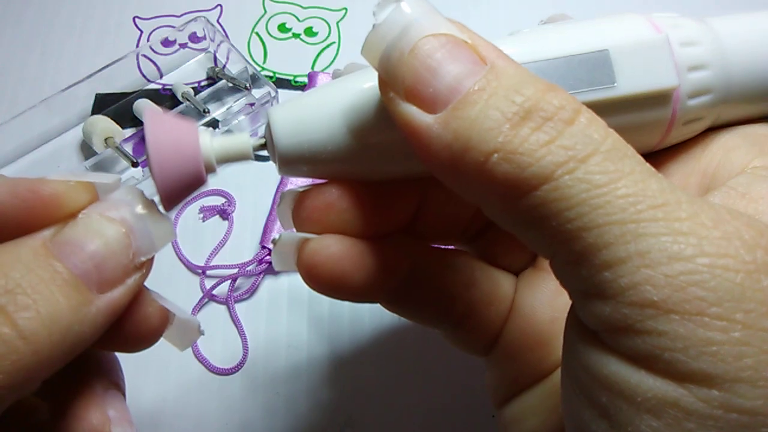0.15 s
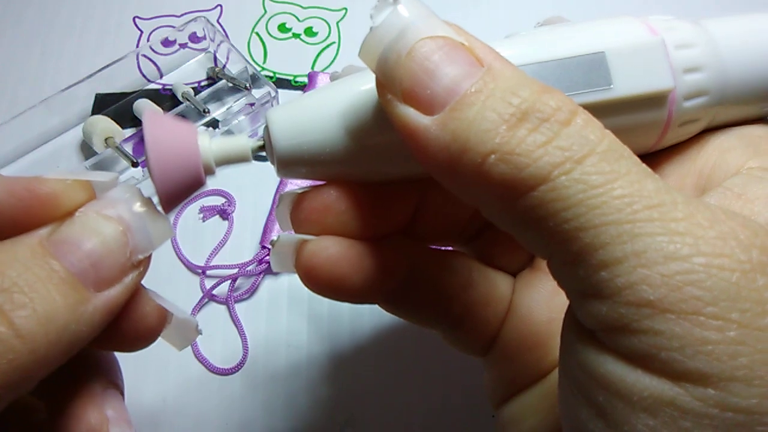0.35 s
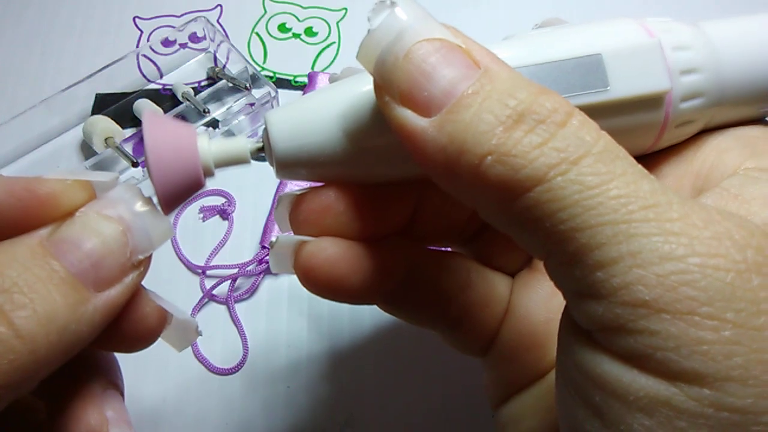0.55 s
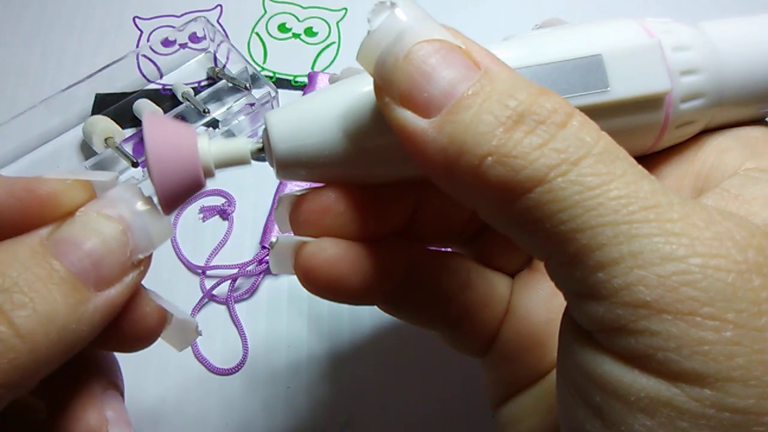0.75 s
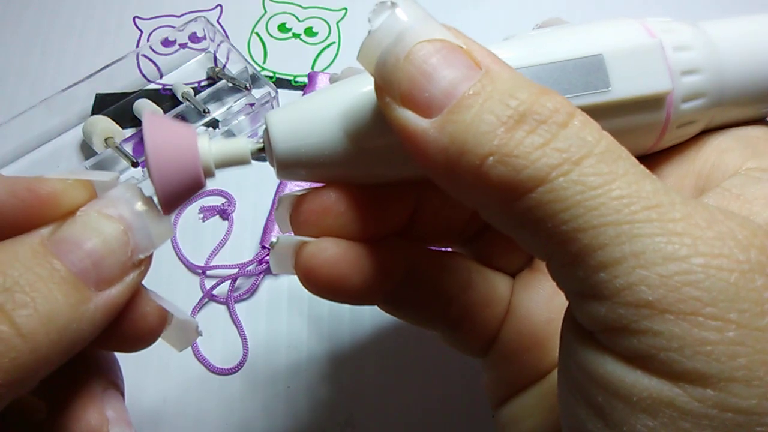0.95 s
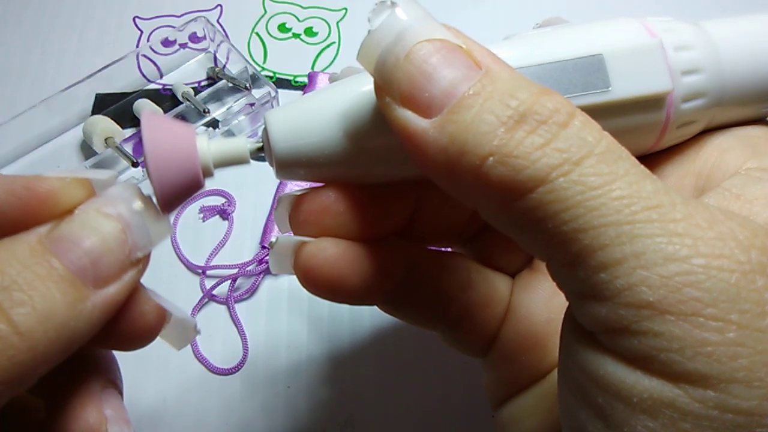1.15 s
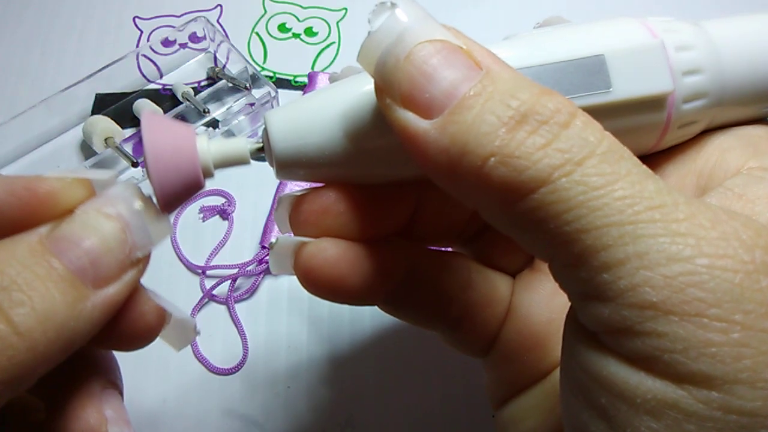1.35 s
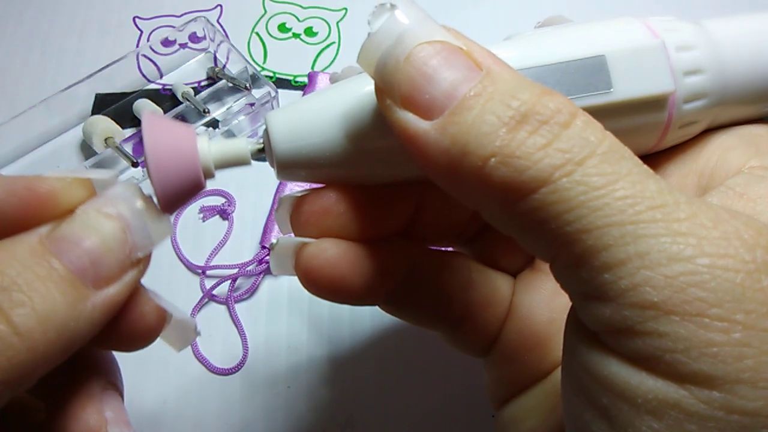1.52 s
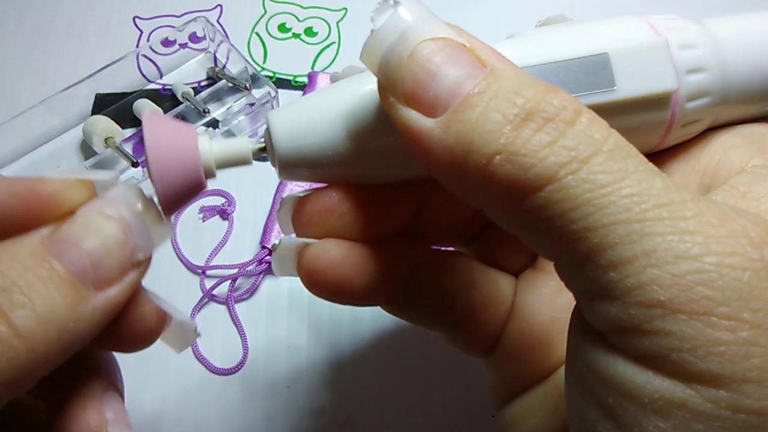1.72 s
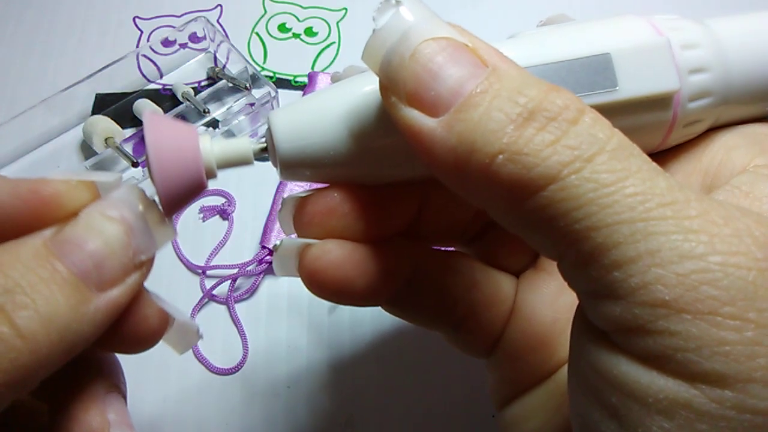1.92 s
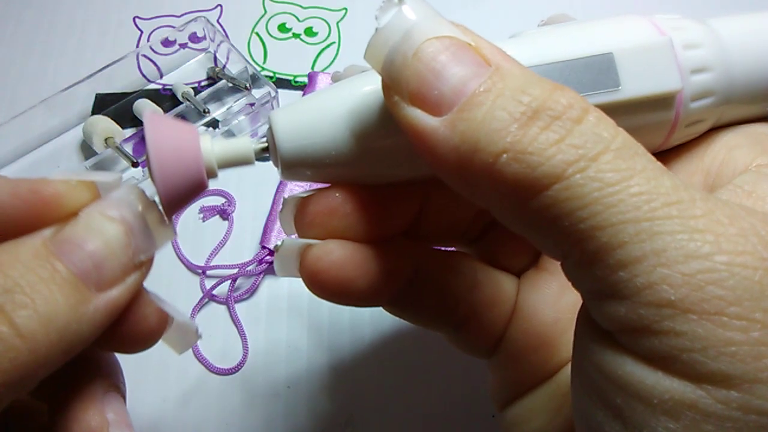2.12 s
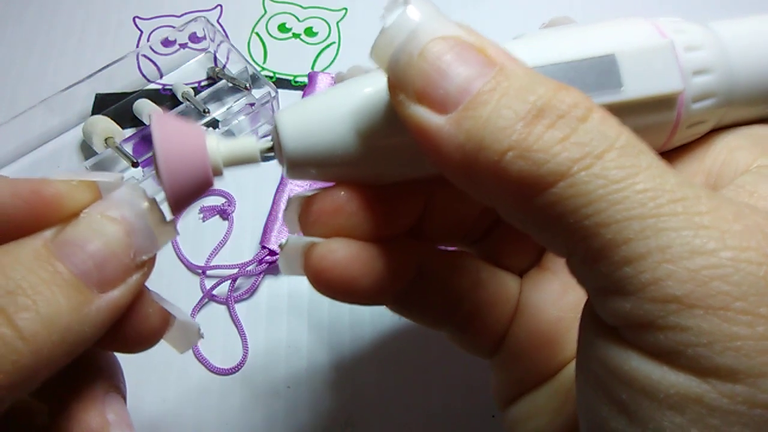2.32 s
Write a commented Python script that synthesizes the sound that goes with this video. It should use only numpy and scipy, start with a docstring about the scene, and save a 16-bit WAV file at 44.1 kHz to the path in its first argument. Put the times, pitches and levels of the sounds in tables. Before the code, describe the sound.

A small electric nail drill works on a plastic nail tip, very close, bright at right and duller at left. From 0 to 0.45 seconds it rattles and scrapes harshly; then mostly buzzy rattle, slowing until 1.1. Pressed hard, it sags to half speed: faint pulsing scrape, wavering low hum, soft hush, small ticks. Around 2.3 it leaps faster, and a hard hissy scrape bites at the end.

```python
"""A small electric nail drill held close to a pair of microphones, over a soft hush and rumble. At first its bit
rattles three times a turn in the chuck, while the stone scrapes a plastic nail tip once a turn and drums it.
Then, pressed hard, the motor sags to about half speed and the rattle mostly stops; at the end the stone jumps
free, the speed leaps up and a hard scrape bites. The motor's hum drops and swells meanwhile. The right
microphone faces the drill; the left hears it late, dull and mostly off the desk."""
import sys
import numpy as np
from scipy import signal
from scipy.fft import rfft, irfft, next_fast_len
from scipy.io import wavfile
from scipy.ndimage import uniform_filter1d, minimum_filter1d, map_coordinates

SR = 44100
rng = np.random.default_rng(int(sys.argv[2]) if len(sys.argv) > 2 else 0)


def volts(x):
    """Linear amplitude factor 10**(x/20) for a level x in dB, scalar or array-like."""
    e = np.asarray(x, float) / 20
    return 10 ** e


def wav_out(sig):
    """Save sig, one row per channel (or a flat mono array), as 16-bit PCM at SR to the path in sys.argv[1]."""
    wavfile.write(sys.argv[1], SR, np.round(np.clip(np.atleast_2d(sig).T, -1, 1) * 32767).astype(np.int16))


N = 104825  # length in samples


def unit(x):
    """Normalisation: x scaled to rms 1."""
    return x / np.sqrt(np.mean(x ** 2) + 1e-20)


def along(points, hz):
    """Logarithmic pitch: values of (pitch_hz, value) points, interpolated on a log axis."""
    point_hz, value = np.transpose(points)
    return np.interp(np.log(hz + 1), np.log(point_hz + 1), value)


def curves(rows):
    """Linear interpolation in time: one value per sample for each column after the time."""
    time_s, *columns = np.transpose(rows)
    return [np.interp(np.arange(N) / SR, time_s, column) for column in columns]


def wobble(rate):
    """Band-limited randomness: a smooth random curve with this many knots a second."""
    knots = rng.standard_normal(int(N * rate / SR) + 4)
    return map_coordinates(knots, [np.arange(N) * rate / SR])


def filtered(x, response):
    """Linear filtering: the spectrum of x times a complex response of frequency."""
    size = next_fast_len(N + SR // 2)
    return irfft(rfft(x, size) * response(np.fft.rfftfreq(size, 1 / SR)), size)[..., :N]


def coloured(x, spectrum):
    """Minimum-phase filtering: the folded cepstrum makes the spectrum causal; the result has rms 1."""
    size = 4096
    gain = volts(along(spectrum, np.fft.rfftfreq(size, 1 / SR)))
    cepstrum = irfft(np.log(np.maximum(gain, 1e-5)))
    cepstrum[1:size // 2] *= 2
    cepstrum[size // 2 + 1:] = 0
    impulse = irfft(np.exp(rfft(cepstrum)))
    return unit(signal.fftconvolve(x, impulse)[:N])


# Spectrum of the room hush: pitch_hz, density_db (relative, per Hz)
HUSH_SPECTRUM = [(30, -31), (170, -23), (600, -34), (3000, -36), (9900, -15.5), (14600, -53)]


def hush():
    """Diffuse background noise: room hush, uncorrelated at the two microphones."""
    level_db = -57
    return volts(level_db) * np.array([coloured(rng.standard_normal(N), HUSH_SPECTRUM) for _ in range(2)])


# Rumble through the hands: time_s, level_db (mean of the two sides)
RUMBLE_LEVEL = [(0, -54), (.4, -71.5), (.46, -76), (1.62, -80), (1.736, -59.5), (1.9, -76), (2.3, -83),
                (2.377, -59)]
# Spectrum of the rumble: pitch_hz, density_db (relative, per Hz)
RUMBLE_SPECTRUM = [(25, -3), (170, -10.5), (400, -18), (880, -60)]


def rumble():
    """Structure-borne noise: soft low rumble through the hands, uncorrelated at the two microphones."""
    level_db = curves(RUMBLE_LEVEL)[0] + [[-2.5], [2.5]]  # left, right
    return volts(level_db) * np.array([coloured(rng.standard_normal(N), RUMBLE_SPECTRUM) for _ in range(2)])


# Decay of desk and hands: pitch_hz, t60_s
DESK_DECAY = [(200, .06), (2000, .045), (10000, .03)]


def desk(x):
    """Early reverberation: short diffuse tails off desk and hands, randomly varied, crossfaded 14 times a second."""
    step = SR // 14
    out = np.zeros((2, N + SR))
    fade = np.hanning(2 * step)
    padded = np.pad(x, (step, 2 * step))
    for start in range(0, N + step, step):
        hz, t, z = signal.stft(rng.standard_normal((2, 4096)), SR, nperseg=128)
        decay = volts(-60 * t / along(DESK_DECAY, hz)[:, None])
        tail = signal.istft(z * decay, SR, nperseg=128)[1]
        tail /= np.linalg.norm(tail, axis=1, keepdims=True)
        piece = padded[start:start + 2 * step] * fade
        wet = signal.fftconvolve(piece[None], tail, axes=1)
        out[:, start:start + wet.shape[1]] += wet
    return out[:, step:step + N]


# Speed of the motor shaft: time_s, speed_turns_per_s
SPEED = [(0.0, 134.4), (0.08, 127.1), (0.2, 125.4), (0.3, 122.0), (0.355, 120.9), (0.39, 127.2),
         (0.44, 115.3), (0.475, 125.0), (0.51, 116.2), (0.56, 130.1), (0.62, 112.4), (0.65, 126.4),
         (0.69, 111.6), (0.77, 117.4), (0.82, 112.7), (0.88, 115.5), (0.95, 107.8), (1.06, 104.2),
         (1.11, 95.7), (1.2, 82.5), (1.28, 72.8), (1.36, 61.5), (1.45, 69.7), (1.55, 76.2), (1.62, 72.4),
         (1.72, 58.3), (1.82, 58.6), (1.9, 76.8), (1.97, 67.5), (2.06, 67.1), (2.13, 54.0), (2.22, 73.4),
         (2.28, 59.6), (2.3, 111.3), (2.38, 137.6)]


def turns():
    """Rotational kinematics: shaft angle in turns, the running integral of speed."""
    return np.cumsum(curves(SPEED)[0]) / SR


# Motor shake: time_s, level_db (before the trim in motor())
HUM_LEVEL = [(0, -60.5), (.33, -70), (.5, -70.5), (.93, -72.5), (1.02, -68.5), (1.13, -80), (1.2, -79),
             (1.39, -70), (1.47, -78), (1.64, -76.5), (1.73, -60), (1.85, -60), (1.92, -73), (1.97, -65),
             (2.04, -80), (2.25, -63), (2.3, -70), (2.35, -63)]
# Shaft orders: multiple of the shaft rate, level_db (relative)
ORDERS = [(1, 0), (2, -8)]


def motor():
    """Rotating imbalance: shaft orders shake the hand-piece; as it sags overtones fade and the hum moves left."""
    angle, (speed,), (level_db,) = turns(), curves(SPEED), curves(HUM_LEVEL)
    octaves = np.log2(speed / 110)
    lines = 0
    for order, db in ORDERS:
        growth_db = 8 * octaves * np.sqrt(order - 1)  # overtones gain with speed
        waver_db = (order - .6) * 3 * wobble(12)
        tone = np.sin(2 * np.pi * (order * angle + rng.random()))
        lines = lines + volts(db + growth_db + waver_db) * tone
    side_db = np.outer([-1, 1], 4 + 7.4 * octaves)  # left, right
    return volts(level_db + 2.5) * lines * volts(side_db)


# Contact strengths: time_s, rattle_db, scrape_db, drumming_db (before each source's own trim)
TOUCH = [(0.0, -27, -29, -43), (0.058, -22, -24.5, -37), (0.15, -25, -27, -51), (0.208, -26, -34.5, -50),
         (0.338, -20, -24, -38.5), (0.414, -26.5, -32, -47), (0.454, -24.5, -48, -47),
         (0.488, -30.5, -50.5, -47.5), (0.64, -31.5, -53, -44), (0.698, -28, -48.5, -44),
         (0.782, -26, -55, -45), (0.914, -29.5, -48, -42), (1.0, -31, -50, -46), (1.06, -28, -51, -45),
         (1.105, -33, -47, -47), (1.14, -44, -49, -58), (1.18, -65, -51, -76), (1.258, -72, -54.5, -76),
         (1.284, -62, -55, -56.5), (1.488, -75, -58, -68), (1.53, -43.5, -53.5, -50.5),
         (1.586, -60, -60.5, -67.5), (1.612, -46.5, -52.5, -52.5), (1.68, -47, -54.5, -65),
         (1.812, -67, -57, -73), (1.872, -61, -52, -53), (1.91, -63, -55, -86), (1.966, -59, -53.5, -50.5),
         (2.054, -47.5, -54.5, -55.5), (2.176, -79, -58.5, -73), (2.23, -68, -52.5, -70),
         (2.252, -68, -54.5, -57), (2.275, -68, -28.5, -81), (2.28, -75, -65, -84), (2.298, -67, -58, -75),
         (2.306, -56, -60.5, -57), (2.322, -40.5, -65, -48.5), (2.35, -39, -63, -49),
         (2.362, -42, -23, -53), (2.377, -47, -26, -65)]


def touch():
    """Contact force as level: the changing rattle, scrape and drumming levels in dB."""
    return curves(TOUCH)


def knocks(angle, contacts, decay_s, slip_turns):
    """Periodic impact: a blow, and a short dying burst of noise, at each contact angle of every turn."""
    scatter_db, drift_db, rise_s = .8, 1, .0007  # spread per blow, slow drift, soft start
    whole_turns = np.arange(-1, int(angle[-1]) + 1)
    blows = np.zeros(N)
    for at, db in contacts:
        slip, size = rng.standard_normal((len(whole_turns), 2)).T
        i = np.searchsorted(angle, whole_turns + at + slip_turns * slip)
        ok = (i > 0) & (i < N)
        hits = np.bincount(i[ok], volts(db + scatter_db * size[ok]), N)
        blows += hits * volts(drift_db * wobble(13.17))
    tail = signal.lfilter([1], [1, -np.exp(-1 / (decay_s * SR))], blows)
    tail = uniform_filter1d(tail, max(1, int(rise_s * SR)))
    return unit(blows), unit(tail * rng.standard_normal(N))


# Spectrum of nail and fingers: pitch_hz, density_db (relative, per Hz)
NAIL_SPECTRUM = [(180, -57), (342, -22), (406, -27.5), (700, -12.5), (1090, -14.5), (1400, -1), (1960, -14),
                 (2350, 2.5), (2710, -12.5), (4000, -2.5), (5200, -19), (8800, -120)]


def drumming():
    """Forced vibration: the stone strikes nail and fingers once a turn and their modes answer."""
    drum_db = touch()[2]
    noise_from_hz, noise_share = 1100, 1.3
    blow, burst = knocks(turns(), [(.55, 0)], decay_s=.006, slip_turns=.002)
    burst = filtered(burst, lambda hz: hz ** 2 / (hz ** 2 + noise_from_hz ** 2))
    return volts(drum_db + 4) * coloured(blow + noise_share * burst, NAIL_SPECTRUM)


def patchy_noise(patchy_db):
    """Non-stationary noise: the colour flickers in patches of time and pitch."""
    z = signal.stft(rng.standard_normal(N), nperseg=256)[2]
    field = uniform_filter1d(rng.standard_normal(z.shape), size=6, axis=0)
    field = uniform_filter1d(field, size=10, axis=1)
    return signal.istft(z * volts(patchy_db * unit(field)), nperseg=256)[1][:N]


# Swing as the stone's high spot scrapes harder than the rest: time_s, swing_db (up and down)
SWING = [(0, 6), (.42, 4), (1.05, 2), (1.15, 9), (1.35, 4), (1.55, 5), (1.78, 3), (1.86, 7), (1.91, 1),
         (1.95, 6), (2.08, 7.5), (2.15, .6), (2.3, .6), (2.36, 8)]
# Spectrum of light grit on plastic: pitch_hz, density_db (relative, per Hz)
SCRAPE_SPECTRUM = [(350, -38), (600, -40), (893, -24.5), (1150, -30), (1600, -20.5), (2350, -8.5),
                   (2760, -8), (4400, -7), (7460, 4.5), (9600, -1), (13400, -10.5), (14300, -11)]
# Spectrum of hard grit contact: pitch_hz, density_db (relative, per Hz)
BITE_SPECTRUM = [(40, -49), (250, -32.5), (700, -42), (1400, -34.5), (3400, -24.5), (4700, -26),
                 (5400, -24), (7570, 1), (9600, -11.5), (12000, -13.5), (13300, -9.5), (14400, -30),
                 (15200, -15)]


def scrape():
    """Abrasive friction: grit noise modulated once a turn by the high spot; a harder scrape bites brighter."""
    scrape_db = touch()[1]
    depth_db, = curves(SWING)
    relanded = np.arange(N) / SR > 2.29  # after the jump the stone lands later in the turn
    high_spot = .25 + .3 * relanded  # angle in turns
    swing_db = depth_db * (2 * np.cos(np.pi * (turns() - high_spot)) ** 4 - 1)
    grain_db = 2.1 * wobble(3000)
    grit = patchy_noise(1.7) * volts(swing_db + grain_db)
    grit /= np.sqrt(np.abs(uniform_filter1d(grit ** 2, SR // 20)))  # even level over 50 ms
    hard = np.clip((scrape_db + 45) / 11, 0, 1)  # the bite takes over from -45 dB up, across 11 dB
    light_part = volts(16) * (1 - hard) * coloured(grit, SCRAPE_SPECTRUM)
    hard_part = volts(11) * hard * coloured(grit, BITE_SPECTRUM)
    return volts(scrape_db) * (light_part + hard_part)


# The bit's main knock in the chuck: angle_turns, level_db
MAIN_KNOCK = [(.49, 0)]
# Lighter contacts: angle_turns, before_db (before the grip shifts), after_db (both before a common trim)
CHATTER = [(.79, -4, 0), (1.17, 0, -5)]
# Spectrum of chuck and shell under the lighter contacts: pitch_hz, density_db (relative, per Hz)
CHUCK_SPECTRUM = [(1650, -52.5), (2800, -21), (3650, -35), (4830, -9.5), (5280, -4.5), (6310, -4),
                  (7480, -0.5), (8230, -11.5), (10800, -40), (13400, -43), (14300, -58)]


def rattle():
    """Impact excitation of resonance: a main knock rings one mode, two lighter contacts ring chuck and shell."""
    angle, rattle_db = turns(), touch()[0]
    decay_s, slip_turns = .0012, .003
    mode_hz, width_hz = 5650, 1400

    def mode(hz):
        return 1j * hz * width_hz / (mode_hz ** 2 - hz ** 2 + 1j * hz * width_hz)

    blow, burst = knocks(angle, MAIN_KNOCK, decay_s, slip_turns)
    total = unit(filtered(blow + .15 * burst, lambda hz: mode(hz) ** 3))
    shifted = np.arange(N) / SR > .64  # the grip shifts
    for at, before_db, after_db in CHATTER:
        blow, burst = knocks(angle, [(at, 0)], decay_s, slip_turns)
        chatter = coloured(blow + 2.5 * burst, CHUCK_SPECTRUM)
        total = total + volts(-3.5 + np.where(shifted, after_db, before_db)) * chatter
    return volts(rattle_db + 5.5) * total


# Response applied to all drill contact sound at the left: pitch_hz, gain_db
LEFT_RESPONSE = [(60, -28), (130, -15), (290, -4.5), (630, 0.5), (1390, 1), (3060, -2), (6710, -10.5),
                 (14700, -17)]


def scene():
    """Direct and reflected paths: the right hears the drill directly, the left late, dull and off the desk."""
    tool, drum = rattle() + scrape(), drumming()
    wet = desk(tool + volts(-3) * drum)
    lag_s = .00008
    late = filtered(volts(-16.5) * tool + volts(-8.5) * drum, lambda hz: np.exp(-2j * np.pi * hz * lag_s))
    left = filtered(late + volts(1) * wet[0], lambda hz: volts(along(LEFT_RESPONSE, hz)))
    right = tool + drum + volts(-16) * wet[1]
    return np.array([left, right]) + motor() + rumble() + hush()


def low_pass(x):
    """Removes everything above the highest recorded frequency."""
    return signal.sosfilt(signal.butter(12, 15340, fs=SR, output="sos"), x)


def record(dry):
    """Peak limiting and band limiting: a fast look-ahead gain holds the peaks, a steep low-pass ends the treble."""
    ceiling, hold, top_hz = .93, 131, 14500  # full scale 1, window in samples, Hz
    need = np.minimum(1, ceiling / (np.abs(dry) + 1e-9))
    gain = uniform_filter1d(minimum_filter1d(need, size=hold), size=hold)
    finished = filtered(dry * gain, lambda hz: 1 / (1 + (hz / top_hz) ** 60))
    return low_pass(finished)


dry = scene()
out = record(dry)
wav_out(out)
```